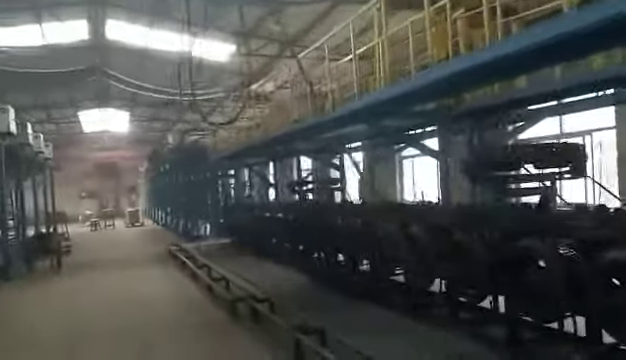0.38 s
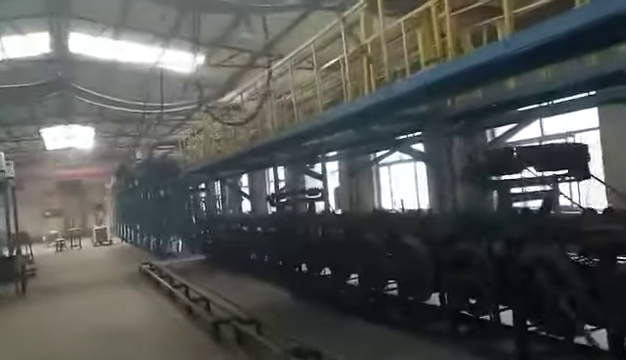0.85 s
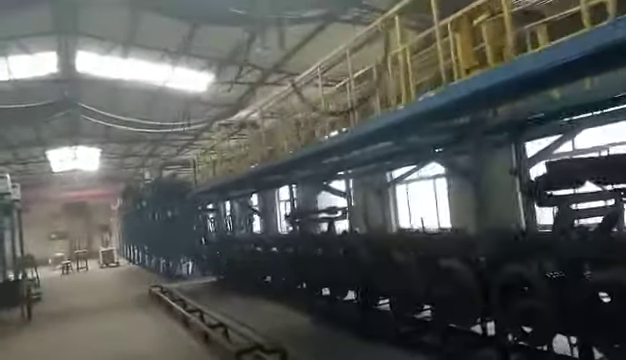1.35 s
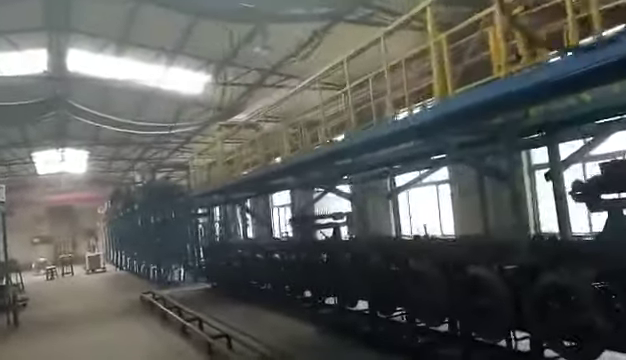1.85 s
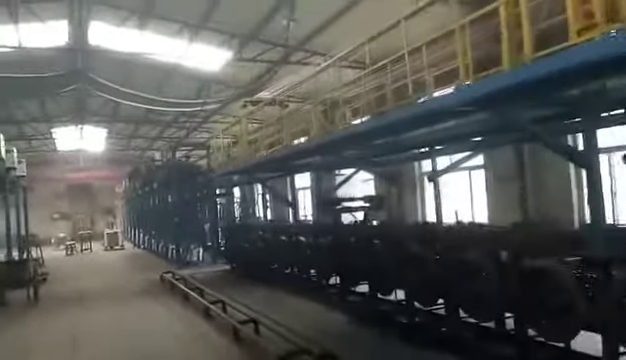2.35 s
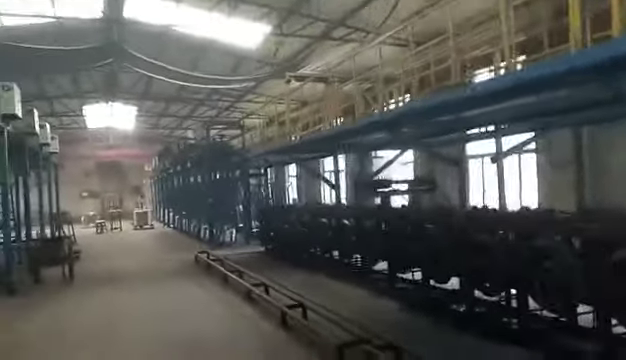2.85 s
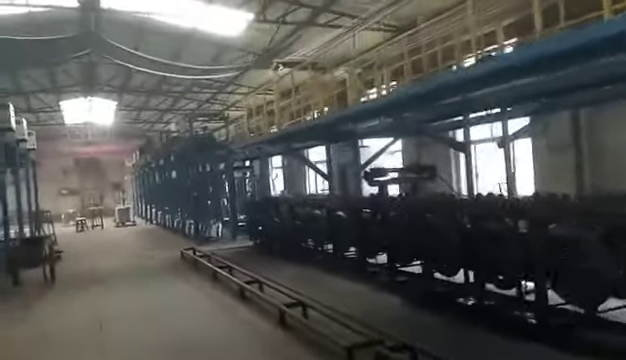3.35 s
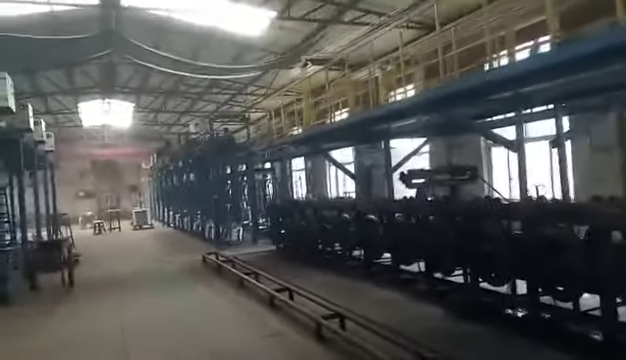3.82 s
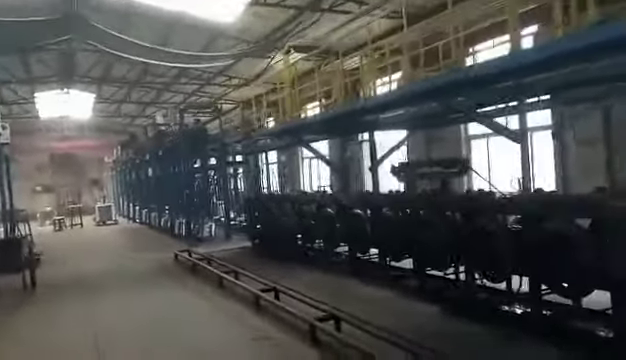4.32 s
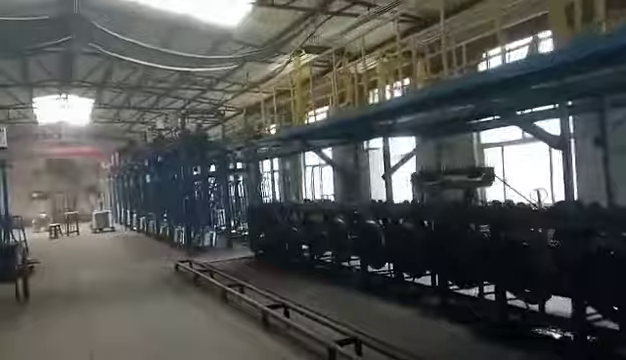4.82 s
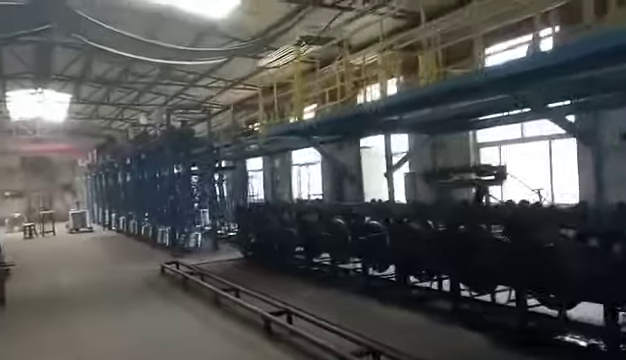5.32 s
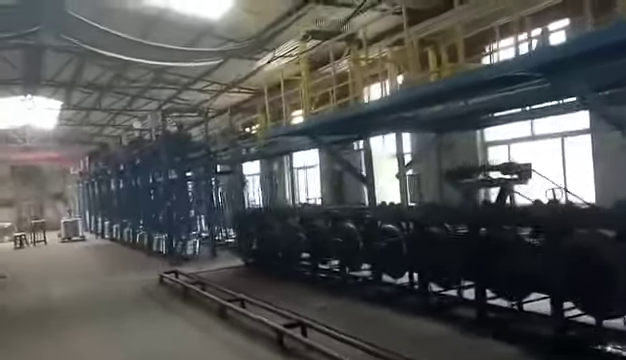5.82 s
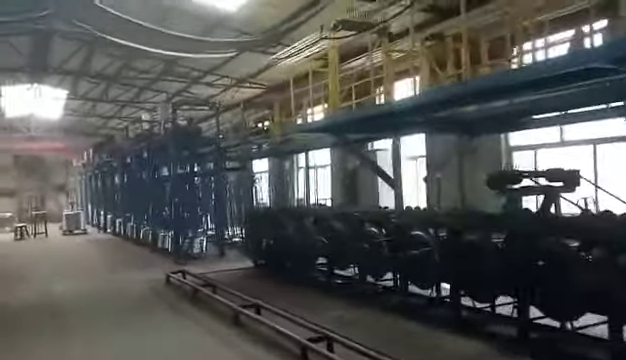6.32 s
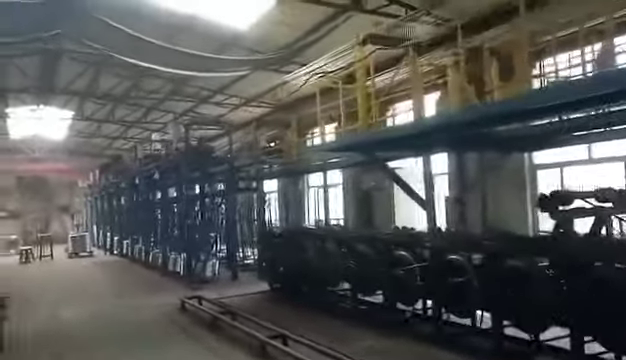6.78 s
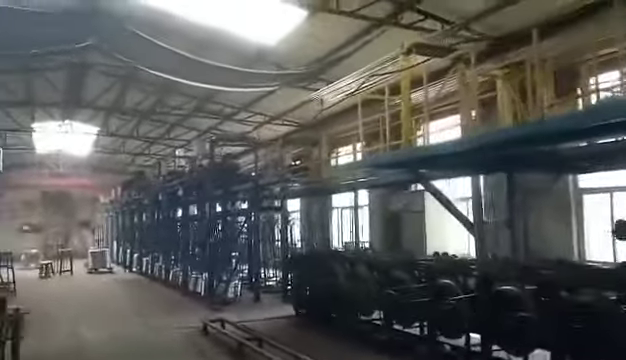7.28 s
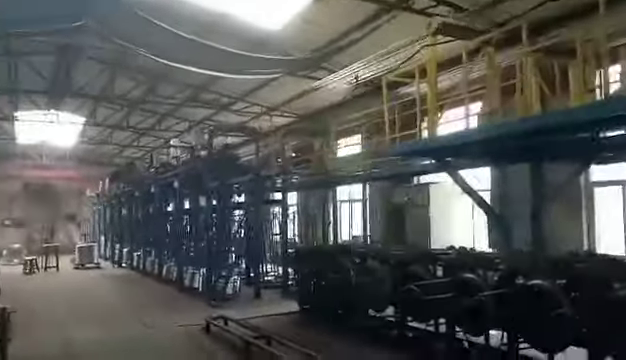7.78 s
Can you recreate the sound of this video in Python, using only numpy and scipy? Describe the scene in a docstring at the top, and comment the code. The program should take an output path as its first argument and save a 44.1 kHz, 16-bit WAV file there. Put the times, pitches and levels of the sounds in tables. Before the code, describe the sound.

Loud, continuous roar of gears and bearings in a steel hall, hum swelling and fading, shrill motor whines on top, sparse echoing clacks late.

```python
"""A steady roar of gears and bearings is heard throughout, from a long row of wire spooling machines in a
steel factory hall, as to someone walking past: noise shaped by a spectrum, partly shared by the two ears.
Hum, whistles and three-tone motor drives are carriers modulated by slow noise; some swell along the walk.
A bearing whirr flutters, a few hard clacks ring through the hall as decaying noise, and a faint hiss lies
on top. A limiter dips the level around bright peaks."""
import sys
import numpy as np
from scipy import signal
from scipy.fft import rfft, irfft, next_fast_len
from scipy.io import wavfile
from scipy.ndimage import uniform_filter1d

SR = 44100
rng = np.random.default_rng(int(sys.argv[2]) if len(sys.argv) > 2 else 0)


def generate_wav(sig):
    """Save sig (samples, or channels by samples) to the path in sys.argv[1] as 16-bit PCM at SR."""
    pcm = np.round(np.clip(np.atleast_2d(sig).T, -1, 1) * 32767).astype(np.int16)
    wavfile.write(sys.argv[1], SR, pcm)


def amplitude_ratio(level_db):
    """Convert a level in decibels to the matching linear amplitude (field) ratio."""
    exponent = np.asarray(level_db, float) / 20
    return 10 ** exponent


N = 348831  # length in samples

# Roar spectrum. Each row: frequency in Hz, relative spectral density in dB.
ROAR_SPECTRUM = [(25, -22.5), (60, -17), (97, -9), (239, -5.5), (311, -3.5), (480, -3.5), (550, -8.5),
                 (698, -4.5), (768, -8.5), (1260, -16.5), (2130, -18), (3270, -20.5), (4200, -20),
                 (5140, -29.5), (6400, -31), (7300, -45.5), (8000, -65)]
# Roar level. Each row: time in seconds, rms level in dB.
ROAR_LEVEL = [(0, -21), (2, -21), (4, -21), (6, -20.5), (7.91, -21)]
# Likeness of the two ears. Each row: frequency in Hz, share of noise power common to both (0 to 1).
EAR_LIKENESS = [(30, .75), (60, .9), (120, .95), (230, .9), (460, .75), (900, .34), (1780, 0), (6900, 0)]
# Stereo balance of roar and whirr. Each row: frequency in Hz, left minus right in dB.
LEFT_OVER_RIGHT = [(40, 7.5), (170, 4.5), (400, 5.5), (840, 4), (1420, 7), (2400, 11), (4070, 7.5),
                   (5500, 3.5), (6900, -4.5)]
# Faint lines that barely rise out of the roar. Each entry: frequency in Hz.
FAINT_LINES_HZ = (1860, 1950, 2250, 2295, 2700, 2880, 3170, 3430, 3640, 5320, 6700)
# Gear hum, near multiples of a shaft turning about nine times a second.
# Each row: frequency in Hz, rms level in dB, width in Hz.
GEAR_HUM = [(89.5, -40.5, 0.46), (119.5, -40.5, 6.2), (212, -37.5, 2.1), (217.4, -45.5, 5.4),
            (268.7, -52, 2.4), (279.9, -34, 1.75), (297, -44, 0.85), (305.8, -39.5, 1.7), (327, -39, 1.3),
            (380.2, -40, 2.3), (385.6, -41, 0.91), (427.6, -48, 2), (451.6, -40.5, 2.1), (588.5, -40, 2.9),
            (599, -40.5, 3.5), (627.7, -38, 10.5), (708.4, -38.5, 5.6),]
# Two strong hum lines and a whistle that swell and fade. Each entry: frequency in Hz.
SWELL_HZ = (317.3, 417.2, 2498)
# Their widths. Each entry: width in Hz.
SWELL_WIDTH_HZ = (1.2, 2, 5)
# Their stereo balance. Each entry: left minus right in dB.
SWELL_PAN_DB = (5.5, 5.5, 11)
# Level of the lower hum line along the walk. Each row: time in seconds, rms level in dB.
LOWER_HUM_LEVEL = [(0.0, -51), (0.33, -29), (1.43, -29.5), (1.52, -54), (1.59, -27), (2.8, -32),
                   (3.08, -28.5), (3.79, -41), (4.05, -22), (5.31, -41), (5.62, -24.5), (6.04, -35),
                   (7.75, -34), (7.91, -46)]
# Level of the upper hum line along the walk. Each row: time in seconds, rms level in dB.
UPPER_HUM_LEVEL = [(0, -53), (2.2, -57), (2.5, -42), (3.15, -32), (3.5, -46), (4.5, -32), (5.0, -46),
                   (5.8, -26), (6.1, -37), (6.9, -29.5), (7.3, -27.5), (7.91, -31.5)]
# Level of the swelling whistle along the walk. Each row: time in seconds, rms level in dB.
SWELLING_WHISTLE_LEVEL = [(0, -37), (0.6, -52), (1.0, -38.5), (1.45, -50), (1.72, -39), (1.9, -54),
                          (2.73, -34.5), (3.25, -57), (3.44, -37), (3.8, -54), (6.9, -55), (7.3, -43),
                          (7.91, -50)]
# Near motor drive. The row: switching frequency in Hz, sideband spacing in Hz, sideband level in dB
# relative to the carrier, line width in Hz, left minus right in dB.
NEAR_DRIVE = (4005, 74, -2.5, 4.5, 10)
# Slow level of the near drive along the walk. Each row: time in seconds, rms level in dB.
NEAR_DRIVE_LEVEL = [(0, -35.5), (0.7, -38), (1.2, -32), (1.6, -37), (2.3, -36), (2.9, -33.5), (4.0, -37),
                    (4.4, -36), (4.9, -35), (5.1, -39), (5.35, -40), (5.62, -39), (6.0, -42), (6.2, -30),
                    (6.65, -38.5), (6.8, -32), (7.23, -40.5), (7.4, -34), (7.91, -35.5)]
# Far motor drive. The row: switching frequency in Hz, sideband spacing in Hz, sideband level in dB
# relative to the carrier, line width in Hz, left minus right in dB.
FAR_DRIVE = (6014, 55, 0, 9, -2)
# Lone whistles. Each row: frequency in Hz, rms level in dB, width in Hz, left minus right in dB.
WHISTLES = [(1387, -51, 16, 6), (2092, -46.5, 5, 11), (2123, -43.5, 7, 11), (2153, -49, 4, 11),
            (2210, -50, 5, 11), (4587, -49.5, 5, 10), (5578, -54, 16, 2), (5830, -64, 4, 0),
            (6444, -64, 10, 0)]
# Broad bearing whirr. Each row: frequency in Hz, relative spectral density in dB.
WHIRR_SPECTRUM = [(1500, -16), (2120, -7.5), (2900, -26.5)]
# Whirr level before its flutter. Each row: time in seconds, rms level in dB.
WHIRR_LEVEL = [(0, -33.5), (3, -34), (5, -40.5), (7.91, -37)]
# Hard clacks, each a few quick touches. Each row: start in seconds, starting level in dB before the contact
# filter, 60 dB decay time in seconds, level in dB of its echo before build-up, flutter and that filter.
CLACK_TOUCHES = [(5.212, -18, .08, -40), (5.220, -11.5, .07, -22), (5.232, -17.5, .12, -40),
                 (5.8775, -13, .02, -40), (5.883, -17.5, .07, -29), (5.893, -21.5, .1, -40),
                 (7.016, -19.5, .08, -34), (7.03, -21, .08, -40)]
# Ringing of a struck frame. Each row: frequency in Hz, relative spectral density in dB.
FRAME_SPECTRUM = [(1300, -24), (1800, -8), (2300, -4), (2800, -5), (3500, 0), (4300, -3), (5000, -18),
                  (6000, -36), (8000, -52)]
# Faint top hiss. Each row: frequency in Hz, relative spectral density in dB.
HISS_SPECTRUM = [(6000, -17), (7500, -1), (9500, -4.5), (12500, -10), (14500, -17), (15500, -14)]
# Hiss level. Each row: time in seconds, rms level in dB.
HISS_LEVEL = [(0, -57), (4.5, -59.5), (7.91, -60.5)]

LEFT_LAG_S = .00022  # delay of the left ear for shared sound


def rms_one(x):
    """Normalisation: the signal is divided by its root mean square."""
    return x / np.sqrt(np.mean(x ** 2) + 1e-20)


def in_time(rows):
    """Linear interpolation: a curve of (s, value) is read at every sample."""
    return np.interp(np.arange(N) / SR, *np.transpose(rows))


def at_hz(points, hz):
    """Logarithmic frequency scale: a table of (Hz, value) is interpolated along log frequency."""
    points = np.array(points)
    return np.interp(np.log(hz), np.log(points[:, 0]), points[:, 1])


def panned(pan_db):
    """Level-difference stereo: half of the decibel difference goes to each ear, with opposite signs."""
    return amplitude_ratio(np.multiply.outer([.5, -.5], pan_db))


def wander(width_hz, steady):
    """Multipath fading: complex low-passed noise per ear, as of many echoes drifting in phase."""
    hop = 32  # samples per slow step
    settle = 3000  # slow steps discarded while the filter settles
    pole = np.exp(-2 * np.pi * hop * np.clip(width_hz, .2, 100) / SR)
    white = rng.standard_normal((2, 2, N // hop + settle + 2))
    filtered = signal.lfilter([1], [1, -2 * pole, pole * pole], white)
    slow = rms_one(filtered[..., settle:])
    path = slow[0] + 1j * slow[1]
    # steady 0 keeps the whole fading, steady 1 only the phase drift
    evenness = np.reshape(np.clip(steady, 0, 1), (2, 1))
    path = path / (np.abs(path) / np.sqrt(2) + 1e-9) ** evenness
    return np.array([np.interp(np.arange(N) / hop, np.arange(len(ear)), ear) for ear in path])


def tone(hz, width_hz, pan_db, steady=(.1, .1)):
    """Narrowband modulation: slow noise broadens a carrier, alike in both ears only at low frequency."""
    path = wander(width_hz, steady)
    if hz < 1000:
        path = path[0]
    carrier = np.exp(2j * np.pi * hz * (np.arange(N) / SR - [[LEFT_LAG_S], [0]]))
    return panned(pan_db)[:, None] * (carrier * path).real


def noise(spectrum, pan_db, lines_hz=()):
    """Partial coherence: coloured noise of rms 1 from a shared part, late on the left, and each ear's own."""
    size = next_fast_len(N)
    hz = np.maximum(np.arange(size // 2 + 1) * SR / size, 1)
    shared, left, right = rfft(rng.standard_normal((3, size)))
    alike = np.clip(at_hz(EAR_LIKENESS, hz), 0, 1)
    lag = np.exp(-2j * np.pi * hz * LEFT_LAG_S * np.array([[1], [0]]))
    ears = np.sqrt(alike) * shared * lag
    ears = ears + np.sqrt(1 - alike) * np.array([left, right])
    colour = amplitude_ratio(at_hz(spectrum, hz))
    line_width_hz, line_height_db = 12, -1.5  # height of the added peak relative to the noise under it
    for line in lines_hz:
        colour = colour * (1 + amplitude_ratio(line_height_db) / (1 + ((hz - line) / line_width_hz * 2) ** 2))
    return rms_one(irfft(ears * colour * panned(pan_db(hz)), size)[:, :N])


def roar():
    """Superposition: many gears and bearings blend into broadband noise with faint lines."""
    blend = noise(ROAR_SPECTRUM, lambda hz: at_hz(LEFT_OVER_RIGHT, hz), FAINT_LINES_HZ)
    return amplitude_ratio(in_time(ROAR_LEVEL)) * blend


def hum():
    """Periodic excitation: turning gears give low lines near multiples of the shaft rate."""
    return sum(amplitude_ratio(db) * tone(hz, width_hz, pan_db=5.8) for hz, db, width_hz in GEAR_HUM)


def swells():
    """Amplitude modulation: two hum lines and a whistle follow set level curves along the walk."""
    levels = LOWER_HUM_LEVEL, UPPER_HUM_LEVEL, SWELLING_WHISTLE_LEVEL
    lines = zip(levels, SWELL_HZ, SWELL_WIDTH_HZ, SWELL_PAN_DB)
    return sum(amplitude_ratio(in_time(level)) * tone(hz, width_hz, pan_db, steady=(.55, .2))
               for level, hz, width_hz, pan_db in lines)


def drive(hz, spacing_hz, side_db, width_hz, pan_db):
    """Carrier and sidebands: a switching tone and its two neighbours, each fading alone among the echoes."""
    carrier = tone(hz, width_hz, pan_db)
    lower = tone(hz - spacing_hz, width_hz, pan_db)
    upper = tone(hz + spacing_hz, width_hz, pan_db)
    side = amplitude_ratio(side_db)
    return (carrier + side * (lower + upper)) / np.sqrt(1 + 2 * side ** 2)


def near_drive():
    """Amplitude modulation: the near drive's three tones fade in and out along the walk."""
    return amplitude_ratio(in_time(NEAR_DRIVE_LEVEL)) * drive(*NEAR_DRIVE)


def far_drive():
    """Superposition: the far drive's three tones waver about one constant level."""
    return amplitude_ratio(-45.5) * drive(*FAR_DRIVE)


def whistles():
    """Narrowband radiation: lone high lines waver independently in each ear."""
    return sum(amplitude_ratio(db) * tone(hz, width_hz, pan_db) for hz, db, width_hz, pan_db in WHISTLES)


def frame():
    """Dense modes: the many resonances of a struck steel frame merge into bright noise."""
    return noise(FRAME_SPECTRUM, lambda hz: 10 + 0 * hz)  # left minus right, dB


def hall(t, echo_db):
    """Reverberation: echoes build up gradually and then decay exponentially."""
    t60_s, build_up_s = 1.3, .012
    return amplitude_ratio(echo_db - 60 * t / t60_s) * (1 - np.exp(-t / build_up_s))


def clacks():
    """Impact and reverberation: each touch dies fast and leaves an echo, their powers adding."""
    power = np.zeros(N)
    # the echo flutters randomly in level: spread 1.5 dB, speed 70 Hz
    flutter = amplitude_ratio(1.5 * wander(70, (0, 0))[0].real)
    for start_s, db, t60_s, echo_db in CLACK_TOUCHES:
        t = np.arange(N - round(start_s * SR)) / SR
        direct = amplitude_ratio(db - 60 * t / t60_s)
        echo = hall(t, echo_db) * flutter[-len(t):]
        power[-len(t):] += direct ** 2 + echo ** 2
    blunt_contact = signal.butter(6, 6500, fs=SR, output="sos")  # low-pass, Hz
    return signal.sosfilt(blunt_contact, np.sqrt(power) * frame())


def whirr():
    """Random modulation: a rough band of bearing noise flutters slowly in level."""
    flutter_hz, spread_db = 4.5, 1.4
    flutter = amplitude_ratio(spread_db * wander(flutter_hz, (0, 0))[0].real)
    closed = [(900, -70)] + WHIRR_SPECTRUM + [(5000, -70)]  # steep skirts, (Hz, dB)
    band = noise(closed, lambda hz: at_hz(LEFT_OVER_RIGHT, hz))
    return amplitude_ratio(in_time(WHIRR_LEVEL)) * flutter * band


def hiss():
    """Broadband noise: a faint hiss, strongest in the top octaves, lies mostly to the left."""
    return amplitude_ratio(in_time(HISS_LEVEL)) * noise(HISS_SPECTRUM, lambda hz: 12 + 0 * hz)  # left minus right, dB


def scene():
    """Linear superposition: the pressures of all sources in the hall add."""
    machines = roar() + hum() + swells()
    whines = near_drive() + far_drive() + whistles()
    return machines + whines + clacks() + whirr() + hiss()


def roll_off(x):
    """The treble ends steeply here."""
    return signal.sosfilt(signal.butter(12, 15480, fs=SR, output="sos"), x)


def record(dry):
    """Peak limiting: gain falls a little ahead of bright peaks and then recovers at a steady rate."""
    limit_db, release_db_per_s, ahead_s, sense_hz = -7.5, 85, .01, 1500
    bright = signal.sosfilt(signal.butter(2, sense_hz, "high", fs=SR, output="sos"), dry)
    peak_db = 20 * np.log10(np.abs(bright).max(axis=0) + 1e-9)
    over_db = np.maximum(peak_db - limit_db, 0)
    # a running maximum on a rising ramp holds each peak and lets it fall at the release rate
    fall_db = release_db_per_s * np.arange(N) / SR
    held_db = np.maximum.accumulate(over_db + fall_db) - fall_db
    ahead = max(round(ahead_s * SR), 1)
    early_db = np.append(held_db[ahead:], np.zeros(ahead))
    duck_db = uniform_filter1d(early_db, size=ahead)
    mix = dry * amplitude_ratio(-duck_db)
    return roll_off(mix)


dry = scene()
out = record(dry)
generate_wav(out)
```